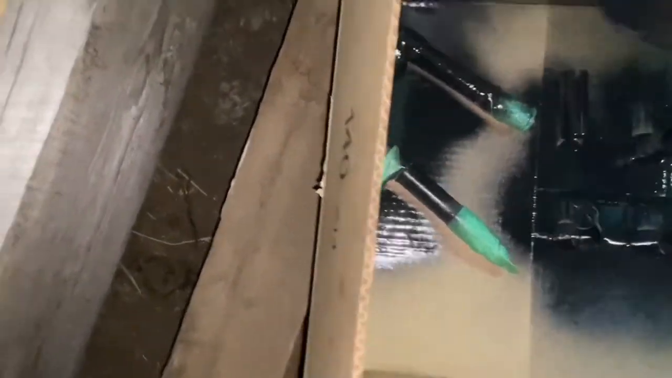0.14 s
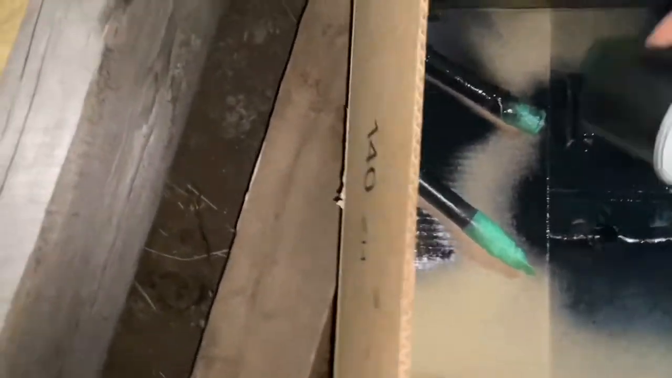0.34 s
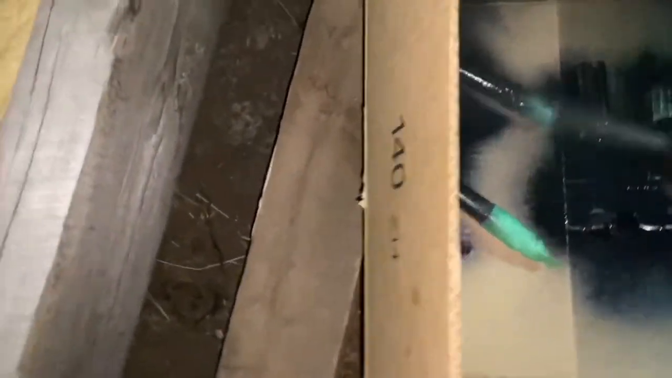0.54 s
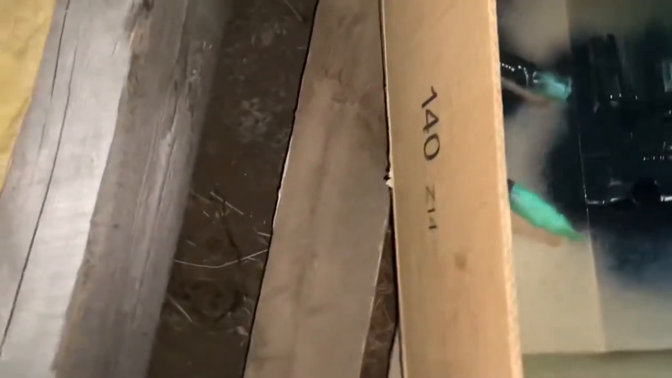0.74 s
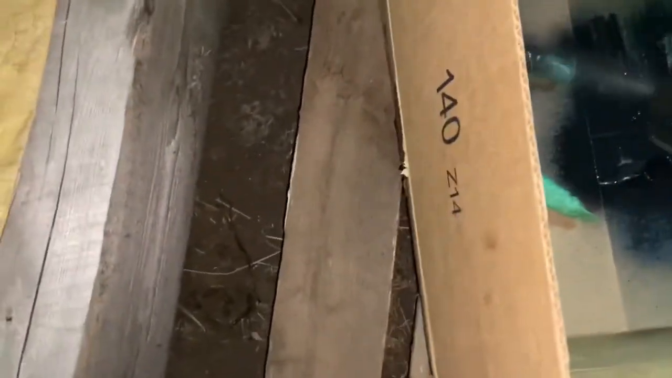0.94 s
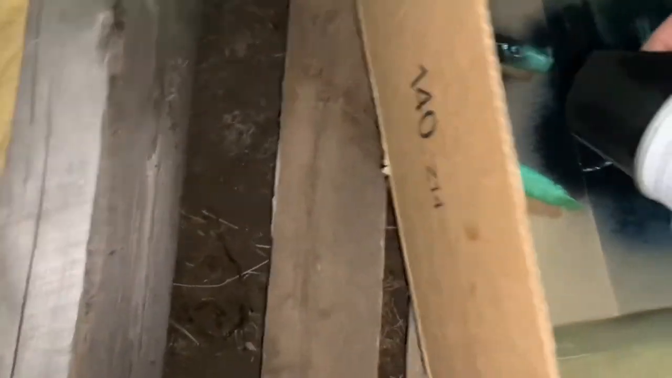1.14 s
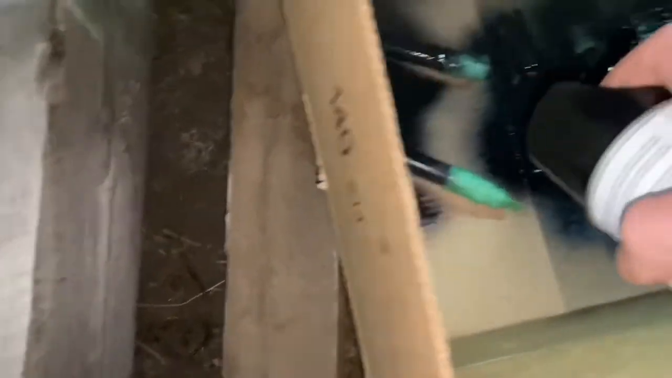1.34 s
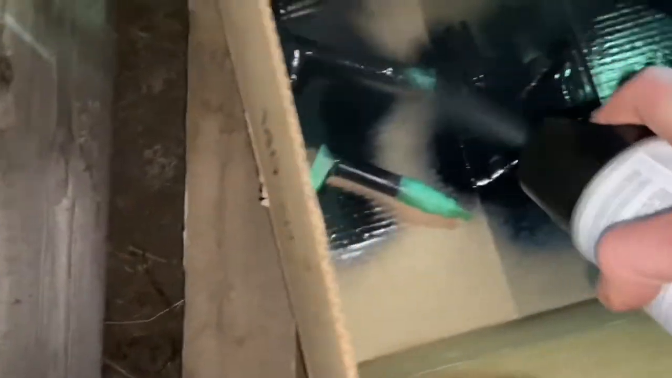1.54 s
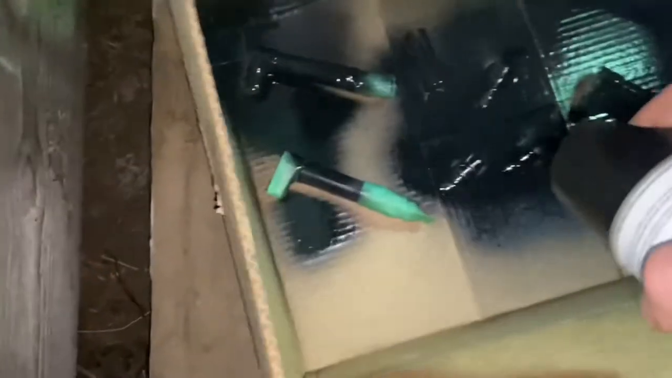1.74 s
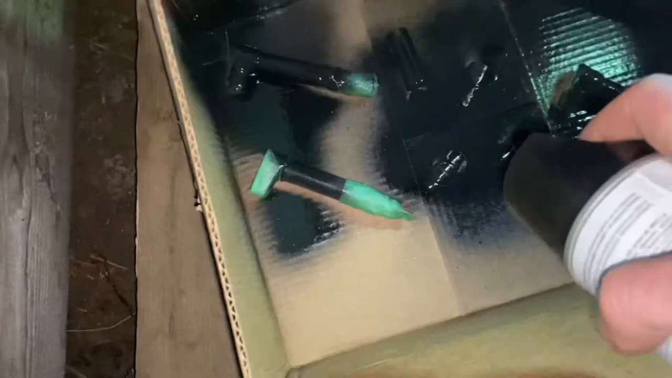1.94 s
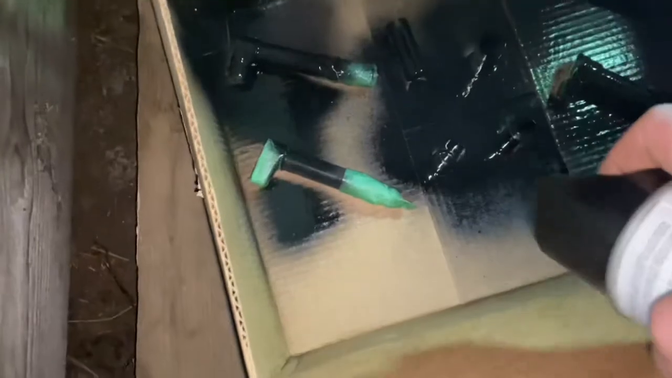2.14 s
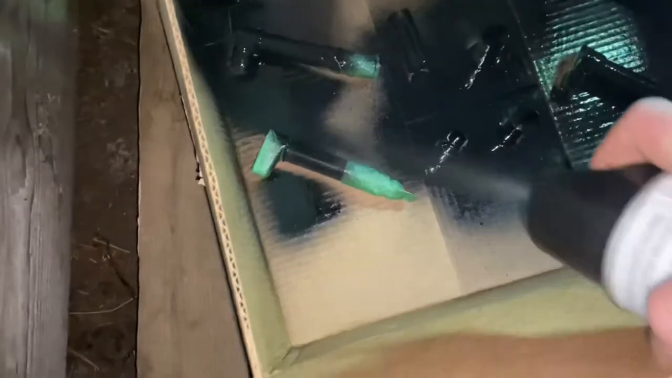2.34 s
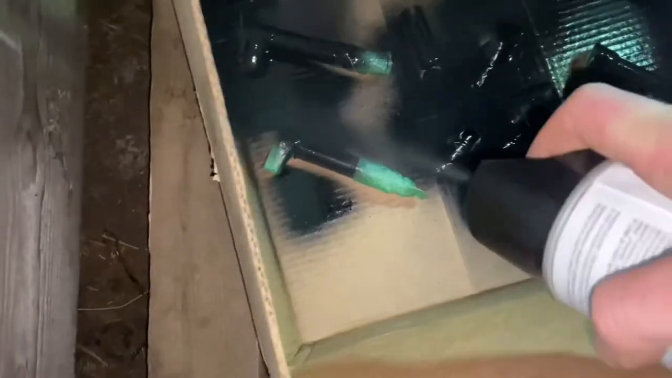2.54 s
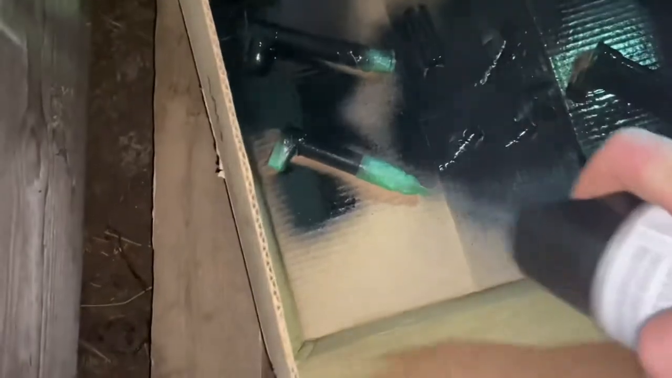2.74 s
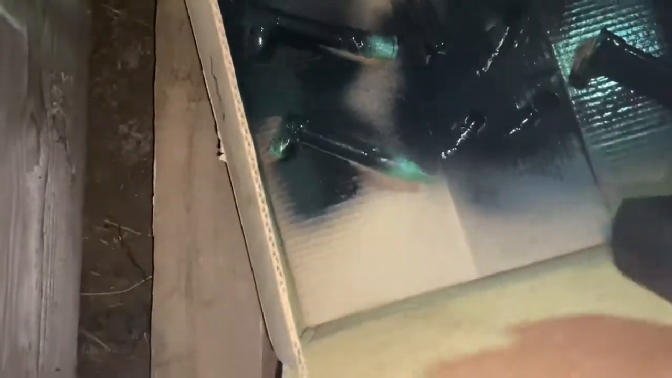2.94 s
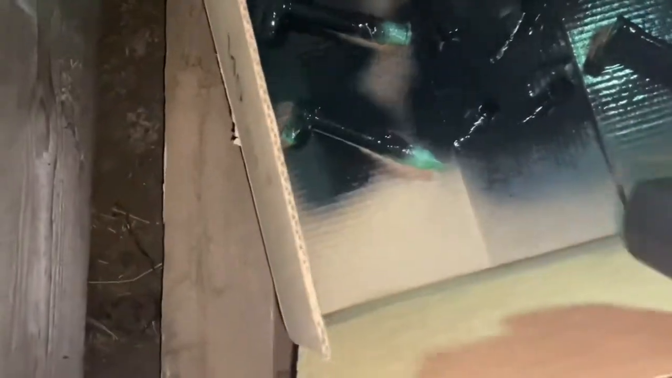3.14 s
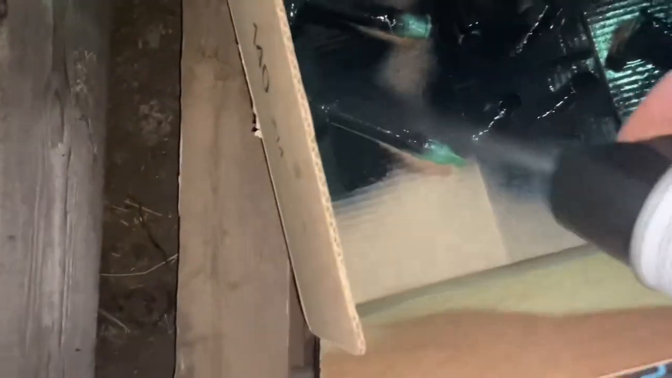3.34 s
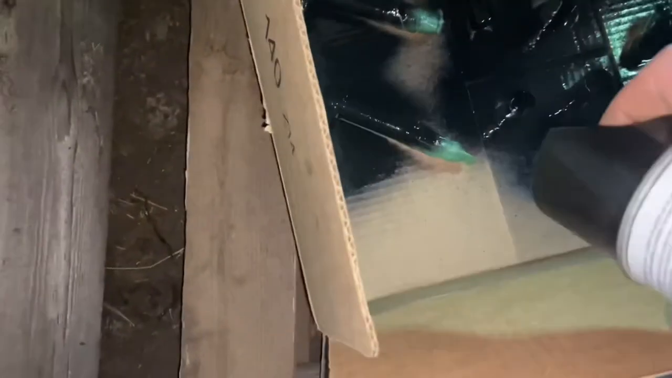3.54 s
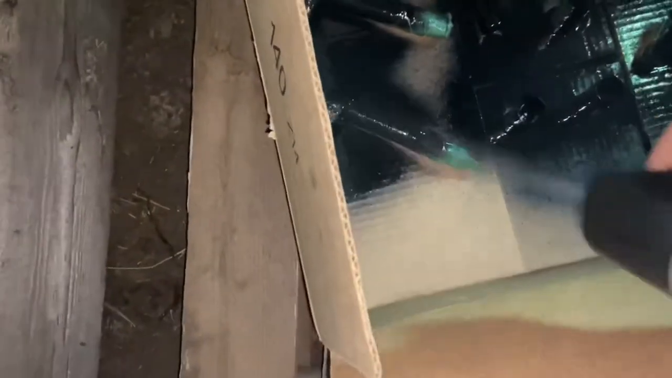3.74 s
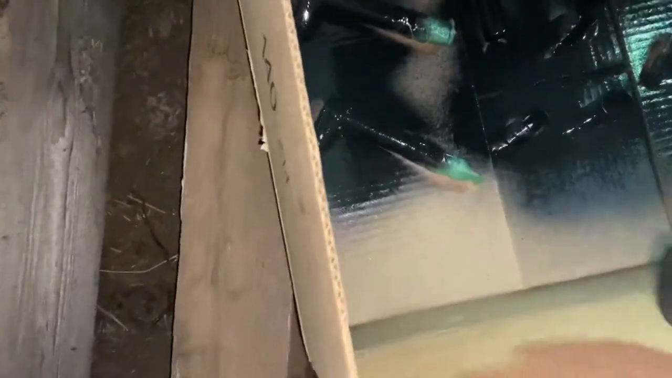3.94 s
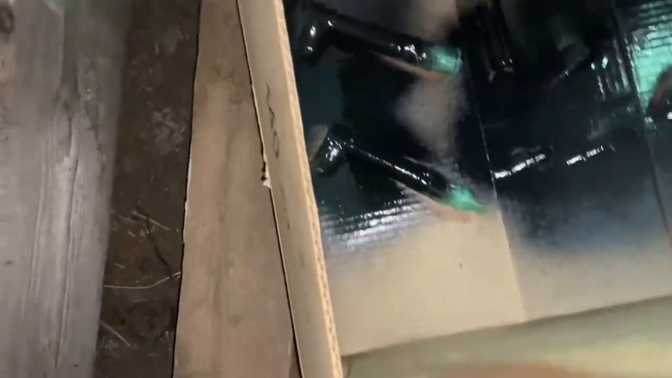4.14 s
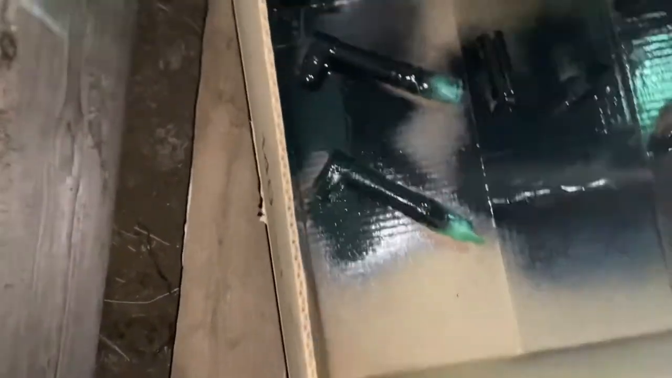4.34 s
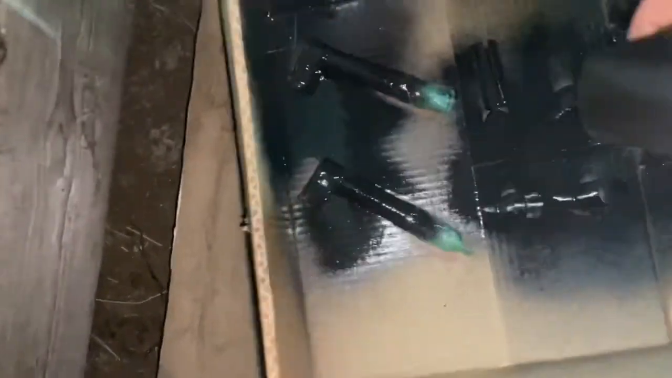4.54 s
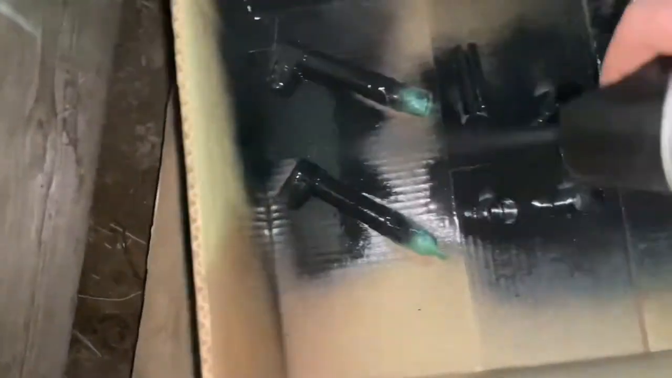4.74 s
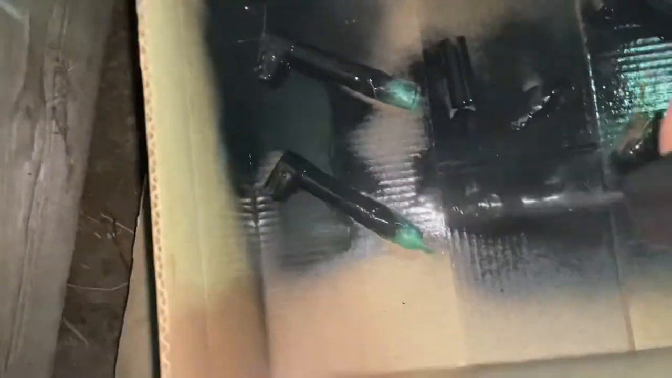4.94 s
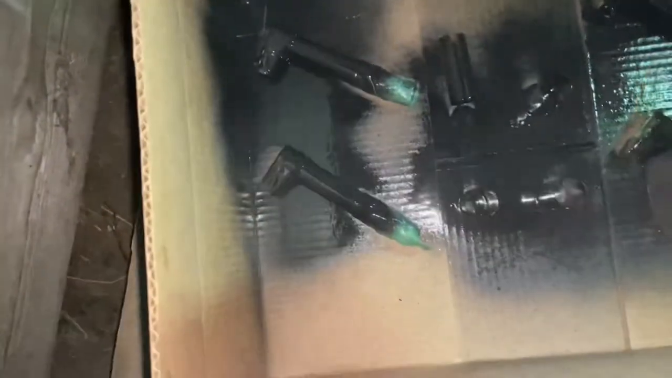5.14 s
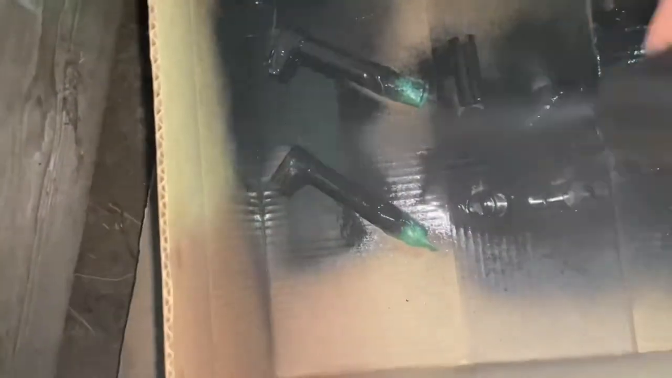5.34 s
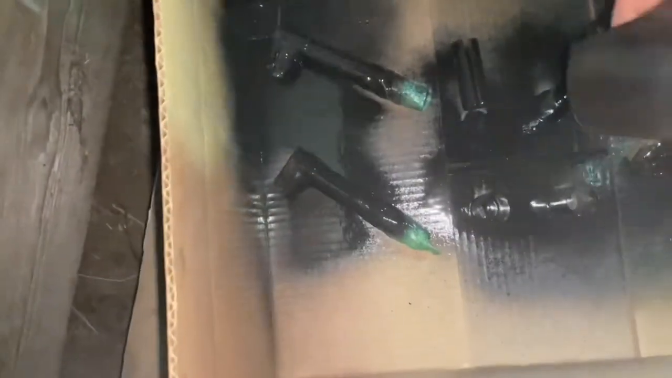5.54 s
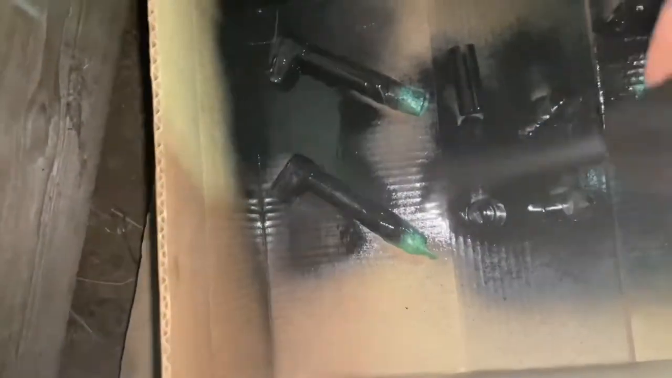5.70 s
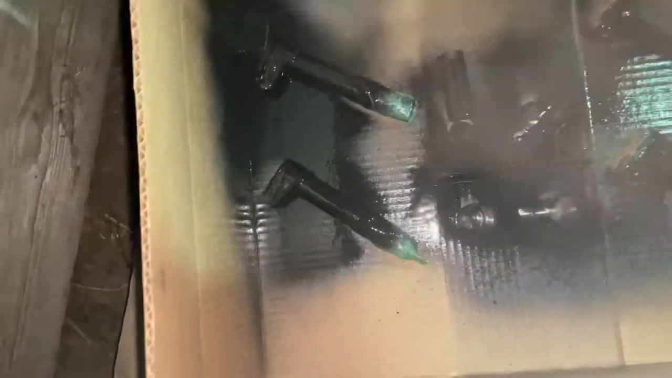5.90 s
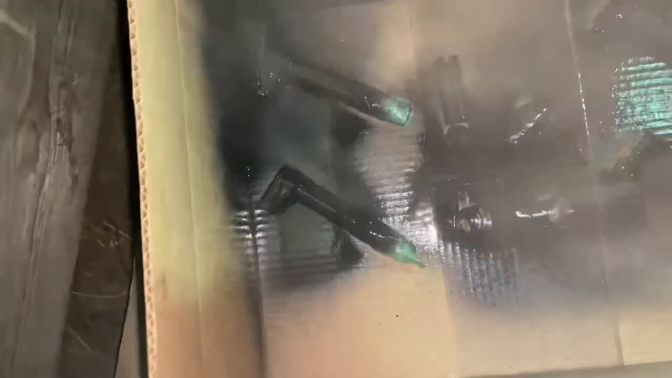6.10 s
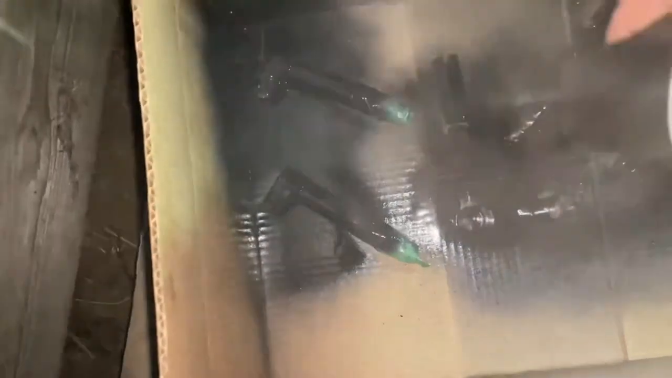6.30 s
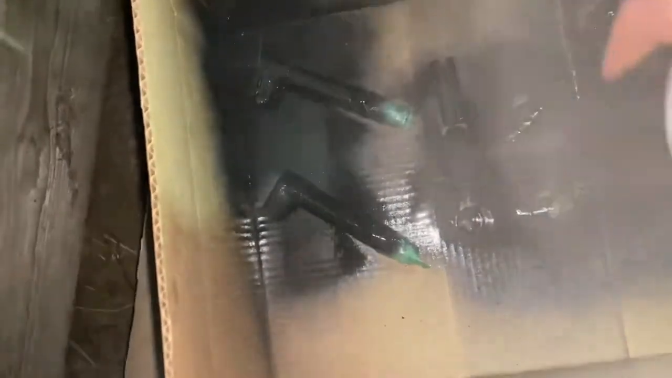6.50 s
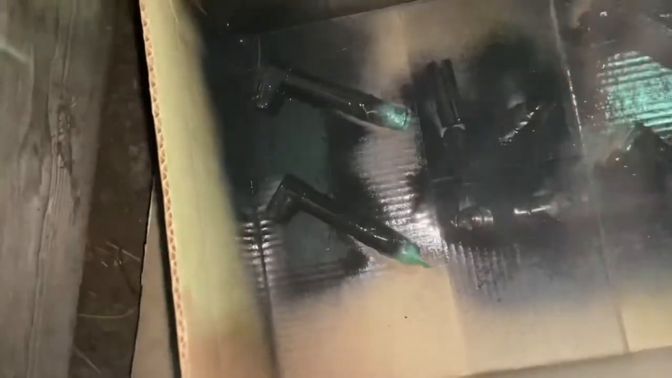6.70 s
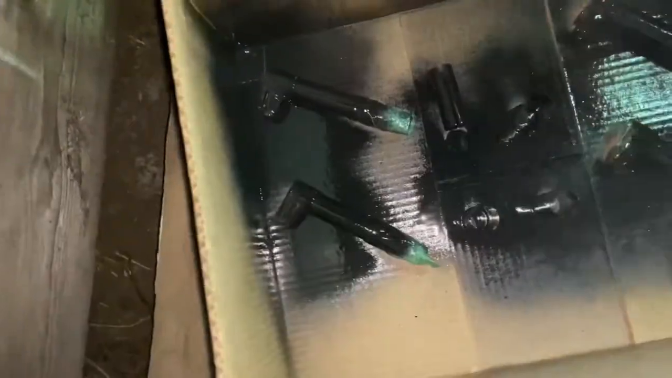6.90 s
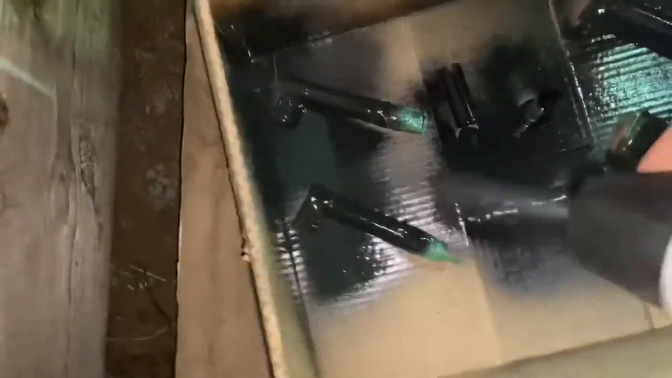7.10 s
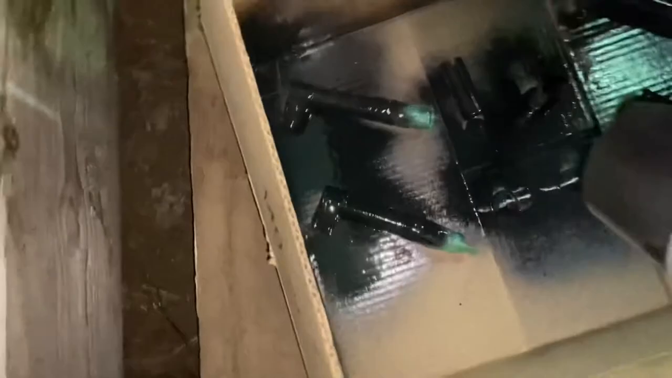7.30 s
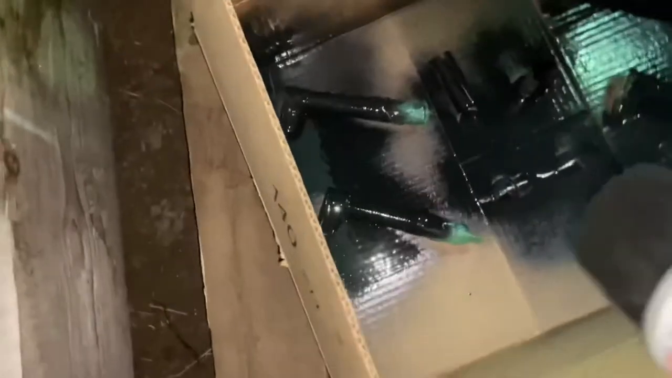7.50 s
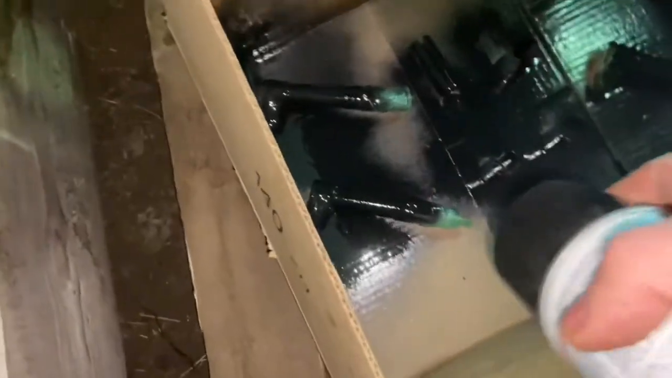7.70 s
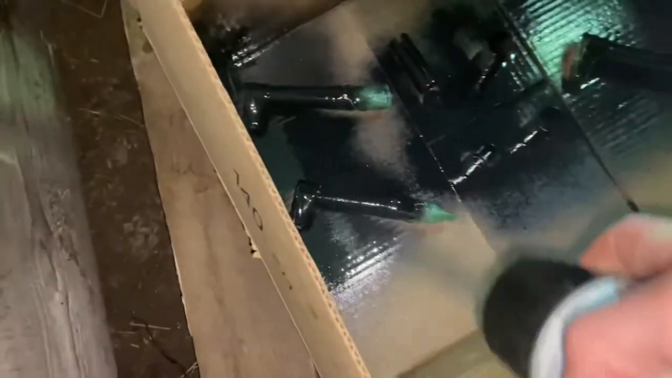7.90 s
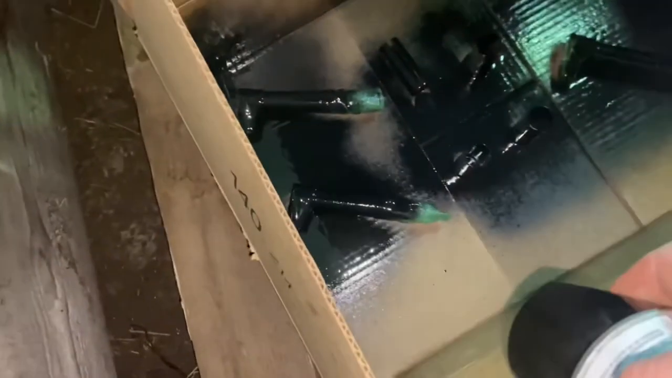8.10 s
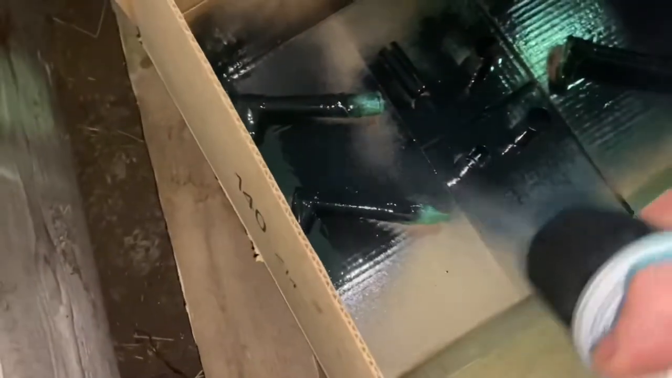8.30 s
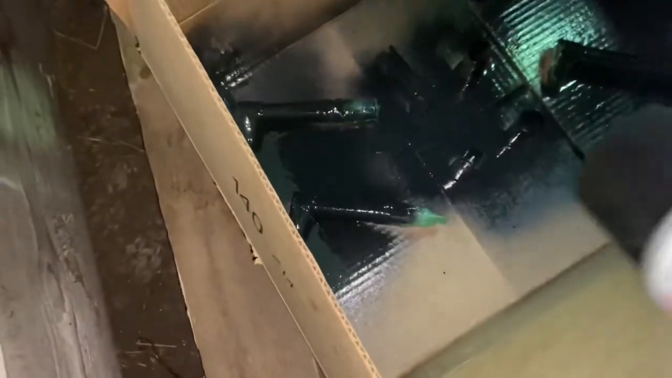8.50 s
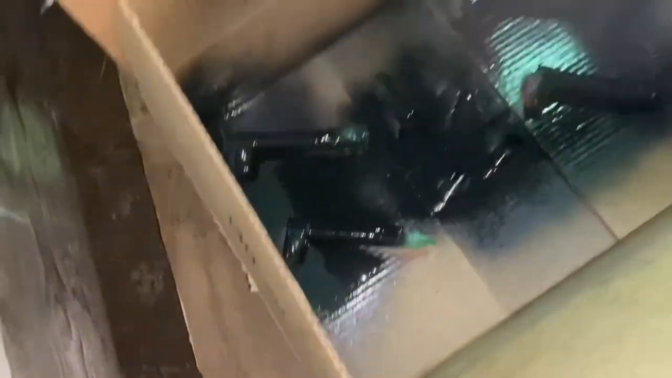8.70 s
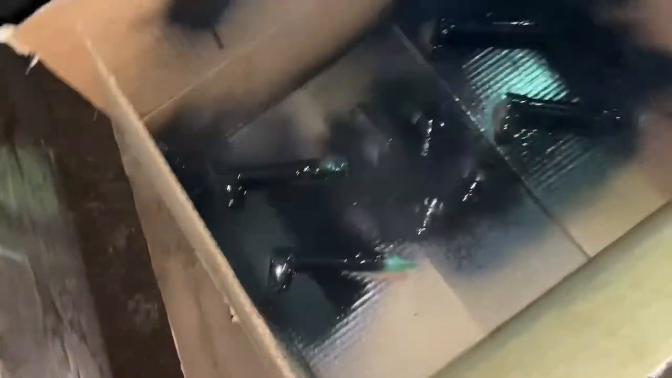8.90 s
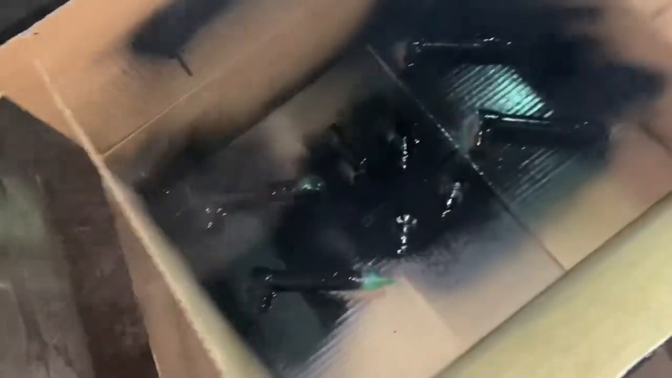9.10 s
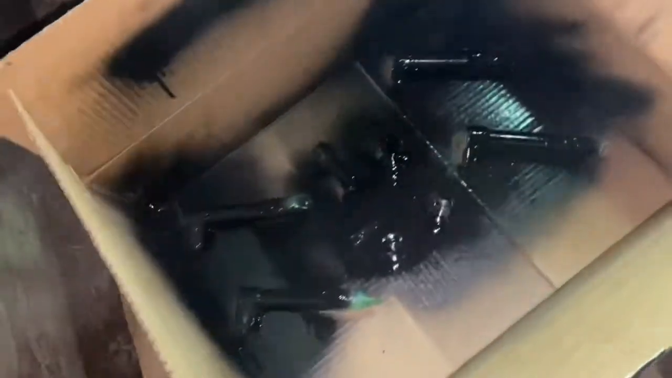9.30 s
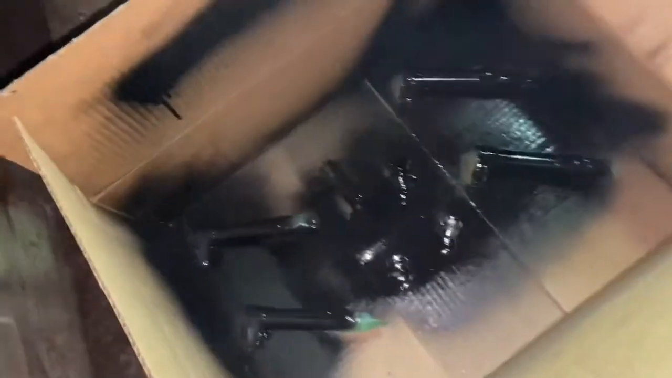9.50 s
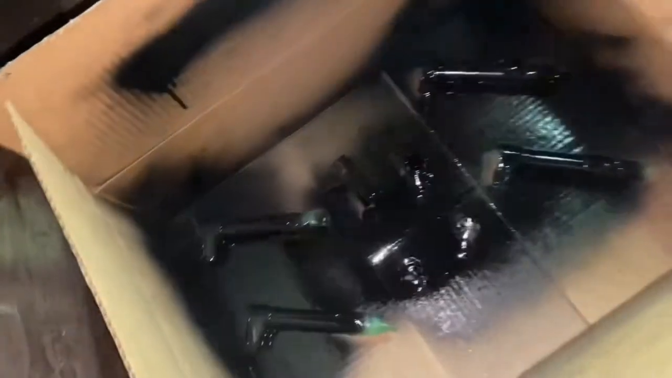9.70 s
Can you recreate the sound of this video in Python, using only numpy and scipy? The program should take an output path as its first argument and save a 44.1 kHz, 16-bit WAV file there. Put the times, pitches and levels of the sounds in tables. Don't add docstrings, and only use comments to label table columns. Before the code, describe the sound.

A close spray can puffs in quick quarter-second bursts inside a carton, before the carton is knocked and dragged and the can's ball clacks loudly.

```python
import sys
import numpy as np
from scipy import signal
from scipy.fft import rfft, irfft, next_fast_len
from scipy.io import wavfile
from scipy.ndimage import uniform_filter1d

SR = 44100
rng = np.random.default_rng(int(sys.argv[2]) if len(sys.argv) > 2 else 0)


def ratio_of_db(decibels):
    return 10 ** (np.asarray(decibels, float) / 20)


def materialize(psi):
    bounded = np.clip(np.atleast_2d(psi).T, -1, 1)
    quanta = np.round(bounded * 32767).astype(np.int16)
    wavfile.write(sys.argv[1], SR, quanta)


N = 429975

# valve opens in seconds, valve shuts in seconds, flow in dB,
# cap ring early in the burst in dB, cap ring late in dB.
SQUEEZES = [(-.05, 0.087, -36, 16, -7), (0.35, 0.609, -36, 0.5, -0.5), (0.836, 1.057, -36, 1, 3.5),
            (1.373, 1.614, -37, 9.5, 5.5), (2.241, 2.514, -34.5, -4.5, -6.5), (2.69, 2.961, -36, 0, 1.5),
            (3.15, 3.389, -35, -6, 3), (3.65, 3.879, -34.5, -9, -3.5), (4.261, 4.484, -35, -2, 10.5),
            (4.661, 4.933, -33.5, -0.5, 4.5), (5.155, 5.393, -34, 2, 2.5), (5.583, 5.849, -33, -3, 5.5),
            (6.073, 6.286, -34, -0.5, 3.5), (6.442, 6.676, -33.5, -4.5, 2.5), (6.951, 7.141, -33.5, -6, -1),
            (7.759, 7.978, -35, 3.5, 4.5), (8.19, 8.369, -35.5, -2.5, -2)]
# cap pitch in Hz, fine mist in dB, low body in dB,
# path to the box wall in ms, gust on the microphone in dB.
HOLDS = [(2363, -1, 0.5, 1.33, -72), (2190, -0.5, 2, 1.33, -78), (2334, -0.5, 1, 1.8, -60),
         (2327, 0, 2.5, 1.5, -57), (2066, -2.5, 1.5, 1.6, -49), (2340, -1.5, 4, 1.5, -46.5),
         (2110, -1, 1, 1.61, -48), (2160, -1, 1, 1.36, -47), (2374, 0, 3.5, 1.5, -51),
         (2310, 0.5, 2.5, 1.3, -51.5), (2326, 1, 2, 1.33, -51.5), (2334, 0.5, 1, 1.33, -68.5),
         (2296, -1, 0.5, 1.33, -79), (2286, -0.5, 0.5, 1.5, -65.5), (2170, -2.5, 0.5, 2.2, -72.5),
         (2210, 1, 3, 1.5, -65), (2423, 2.5, 3, 1.7, -47)]
# time in seconds, level in dB, brightness in dB.
BOX_DRAG = [
    (8.41, -57, -10.5),
    (8.65, -62, -2.5),
    (8.81, -57.5, -6.5),
    (8.89, -38.5, -20),
    (9.05, -42.5, -1.5),
    (9.08, -56.5, -2.5),
    (9.155, -53.5, 0),
    (9.175, -51, 1),
    (9.24, -62, -7),
]


def evened(x):
    return x / np.sqrt(np.mean(x ** 2) + 1e-20)


def read(points, hz):
    f, value = np.transpose(points)
    return np.interp(np.log(hz + 1), np.log(f + 1), value)


def add(mix, s, sound):
    part = mix[..., max(round(s * SR), 0):][..., :sound.shape[-1]]
    part += sound[..., :part.shape[-1]]


def follow(table, t, column, silent=None):
    points = [(row[0], row[column]) for row in table]
    if silent is not None:
        points = [(points[0][0] - .012, silent)] + points + [(points[-1][0] + 0.0076, silent)]
    return np.interp(t, *np.transpose(points))


def passband(x, lo_hz, hi_hz):
    sos = signal.butter(2, [lo_hz, min(hi_hz, 20000)], "bandpass", fs=SR, output="sos")
    return signal.sosfilt(sos, x)


def ring(modes, length=6000):
    t = np.arange(length) / SR
    return sum(ratio_of_db(db - 60 * t / max(t60, .005)) * np.sin(2 * np.pi * hz * t) for hz, db, t60 in modes)


def flicker(ms, depth_db):
    pole = np.exp(-1000 / (ms * SR))
    return ratio_of_db(depth_db * evened(signal.lfilter([1], [1, -pole], rng.standard_normal(N))))


def noise(colour, size, lo_hz, hi_hz, patchy_db):
    # frequency in Hz, likeness of the two ports (0-1).
    likeness = [(60, .99), (600, .96), (1100, .86), (1900, .99), (3100, .75), (3600, .9), (4500, .75),
                (5000, .97), (6000, .93), (6900, .985), (7900, .985), (8700, .8), (9900, .997),
                (11000, .997), (12000, .8), (13000, .993), (14000, .993), (15000, .8)]
    hop = size // 4
    frames, hz = N // hop + 5, np.fft.rfftfreq(size, 1 / SR)[:, None]
    a, b, c, d, patches = rng.standard_normal((frames, len(hz), 5)).T
    patches = uniform_filter1d(uniform_filter1d(patches, size=3, axis=0), size=24, axis=1)
    blotches = uniform_filter1d(uniform_filter1d(d * a, size=14, axis=0), size=6, axis=1)
    patches = .4 * evened(blotches[::-1]) + np.minimum(evened(patches), .8)
    same, left = np.clip(read(likeness, hz), -1, 1), a + 1j * b
    right = same * left + np.sqrt(1 - same ** 2) * (c + 1j * d)
    scatter = np.clip(hz / 5200, .35, 1)
    gain = ratio_of_db(colour(hz, np.arange(frames) * hop / SR) + patchy_db * scatter * patches)
    band = ((hz > lo_hz) & (hz < hi_hz))[:, 0]
    gain = gain / np.sqrt((gain[band] ** 2).sum(0).mean() * 3)
    return signal.istft(np.array([left, right]) * gain, nperseg=size, noverlap=size - hop)[1][:, :N]


def valve(t):
    # seconds from opening, flow in dB.
    press = [
        (-.026, -72),
        (-.02, -25.5),
        (-.004, -16),
        (.004, -5.5),
        (0.024, 0.5),
    ]
    # seconds from shutting, flow in dB.
    release = [
        (-.06, 0.5),
        (0, -3.5),
        (.02, -37.5),
        (.05, -92),
    ]
    leak_s = [.02, 0.029, 0.018, 0.029, 0.024, .024, 0.024, 0.025, 0.026, 0.018, 0.022, 0.018, .017, 0.019,
              0.016, 0.024, 0.015]
    usual_leak_s, sag_db_per_s = .02, 5
    opens, shuts, flow_db = np.array(SQUEEZES)[:, :3].T
    k = np.searchsorted((shuts[:-1] + opens[1:]) / 2, t)
    since = t - opens[k]
    leak_time = np.where(since < 0, since * usual_leak_s / np.array(leak_s)[k], since)
    edges = np.interp(leak_time, *np.transpose(press)) + np.interp(t - shuts[k], *np.transpose(release))
    return k, flow_db[k] + edges - sag_db_per_s * np.clip(since - .12, -.12, .3), since


def yard():
    # time in seconds, level in dB.
    rumble = [(0, -65.5), (1.2, -67.5), (1.6, -65.5), (2.2, -55.5), (2.7, -59), (5.2, -61.5), (5.5, -65.5),
              (6.6, -74.5), (7.1, -67), (7.75, -68.5), (7.9, -53), (8.5, -60.5), (9.2, -57.5), (9.75, -58)]
    # frequency in Hz, level in dB.
    low = [(20, -17), (32, -32.5), (45, -4), (70, 0.5), (120, -6), (250, -6), (500, -12), (900, -39.5),
           (5000, -45), (9000, -49.5)]
    # time in seconds, pitch in Hz, level in dB.
    motor = [
        (1.55, 113, -63.5),
        (1.9, 114.4, -62.5),
        (2.3, 116.3, -58),
        (2.65, 113.6, -62),
    ]
    # time in seconds, pitch in Hz, level in dB.
    drone = [
        (8.3, 67.9, -66),
        (8.368, 65.4, -60),
        (9.398, 66.4, -58.5),
        (9.494, 68.8, -50),
        (9.75, 68, -61.5),
    ]
    gust_fade_db_per_s = 17
    t = np.arange(N) / SR
    burst, flow_db, since = valve(t)
    gust = ratio_of_db(np.array(HOLDS)[burst, 4] + flow_db + 36.5 - gust_fade_db_per_s * since)
    level = np.hypot(ratio_of_db(follow(rumble, t, 1)), gust)
    out = level * noise(lambda hz, s: read(low, hz) + 0 * s, size=2048, lo_hz=30, hi_hz=160, patchy_db=1.5)
    waver = uniform_filter1d(flicker(40, 2.5), size=1500)
    for rows, second_db, uneven in ((motor, -5, 1), (drone, -14, 2)):
        turn = 2 * np.pi * np.cumsum(follow(rows, t, 1)) / SR
        tone = np.sin(turn) + ratio_of_db(second_db) * np.sin(2 * turn)
        out = out + waver ** uneven * ratio_of_db(follow(rows, t, 2, silent=-110)) * tone
    return out


def walls(x):
    t = np.arange(9000) / SR
    common, left, right = rng.standard_normal((3, 9000)) * ratio_of_db(-60 * t / 0.14) * (t > .003)
    tail = common + .35 * np.array([left, right])
    return signal.oaconvolve(x[None], tail / np.linalg.norm(tail[0]), axes=1)[:, :N]


def dragging(t):
    return (t > BOX_DRAG[0][0]) & (t < BOX_DRAG[-1][0])


def strokes(t):
    # start in seconds, level in dB,
    # fade in dB per second, brightness in dB.
    rustles = [(0, -49, 15, 0.5), (.62, -52, 100, -4.5), (1.08, -57.5, 73.5, -1), (1.63, -60, 68, -8.5),
               (1.8, -70.5, 4.5, -27.5), (2.03, -68.5, 22, -6), (2.1, -68, -2.5, -27),
               (2.53, -58, 97.5, -6.5), (2.98, -63.5, 35, 0.5), (3.05, -57.5, 76, -1.5),
               (3.4, -60.5, 70.5, -11.5), (3.9, -64, -6, 0), (4.5, -52, 87.5, -4.5),
               (4.96, -61.5, 163.5, -0.5), (5.1, -76, 1, -9), (5.42, -58.5, 159.5, -4.5),
               (5.5, -69, 1.5, -8.5), (5.87, -59, 156, -14), (5.97, -76.5, 1.5, -11.5),
               (6.3, -54.5, 148, -10), (6.69, -60.5, -2.5, 0.5), (7.17, -58, 17, -2), (7.54, -63.5, 8, -3),
               (8.001, -48.5, 179.5, -2.5), (9.2, -54.5, 0.5, -3)]
    dulling = 0.4
    rows = np.array(rustles)
    s, db, fade, bright_db = rows[np.searchsorted(rows[1:, 0], t)].T
    faded = np.minimum(fade * (t - s), 25.5)
    level_db = np.where(dragging(t), follow(BOX_DRAG, t, 1), db - faded)
    return level_db, np.where(dragging(t), follow(BOX_DRAG, t, 2), bright_db - dulling * faded)


def friction():
    # frequency in Hz, level in dB.
    cloth = [(150, -26), (500, 1), (1000, 0.5), (2200, -3.5), (4000, -3.5), (6000, -5.5), (10000, -11),
             (16000, -16)]
    # frequency in Hz, level in dB.
    cardboard = [(150, -7), (230, -12), (270, 14.5), (320, -19), (600, 1), (1000, -4), (2000, -3),
                 (3000, -7), (6000, -6), (10000, -11), (16000, -14)]
    # time in seconds, half
    # length in seconds, frequency in Hz, level in dB.
    swishes = [
        (6.864, 0.2, 540, 13.5),
        (8.733, 0.12, 3000, 11.5),
        (8.752, 0.054, 5870, 9),
    ]

    def colour(hz, t):
        body = np.where(dragging(t), read(cardboard, hz), read(cloth, hz))
        for s, half, swish_hz, swish_db in swishes:
            octaves = np.log2((hz + 1) / swish_hz)
            body = body + swish_db * np.exp(-((t - s) / half) ** 4 - (octaves / 0.31) ** 2)
        return body + (strokes(t)[1] + 3) * np.clip(np.log2((hz + 1) / 2000) / 2.8, 0, 2)

    t = np.arange(N) / SR
    grain_db = np.where(dragging(t) & (t > 8.87), 3, 1.6)
    stroke = ratio_of_db(uniform_filter1d(strokes(t)[0], size=200) + 0.52 * dragging(t)) * flicker(5.8, grain_db)
    return stroke * noise(colour, size=512, lo_hz=700, hi_hz=3500, patchy_db=3.0)


def thumps():
    # time in seconds, peak in dB, deep thud over it in dB,
    # panel tension as a pitch factor.
    blows = [
        (7.85, -37, -2, 1.07),
        (7.928, -26, -13.5, 1.12),
        (8.02, -26.5, -9.5, 1.0),
    ]
    # frequency in Hz, level in dB, t60 in seconds.
    panel_modes = [(154, -20, 0.27), (204, -6.5, 0.25), (240, 0.5, 0.13), (315, -3.5, 0.086)]
    out, t = np.zeros(N), np.arange(9000) / SR
    thud = ratio_of_db(-60 * t / 0.39) * np.sin(2 * np.pi * 46 * t) * np.minimum(t / 0.022, 1)
    for s, db, thud_db, tension in blows:
        tuned = [(hz * tension, d, t60) for hz, d, t60 in panel_modes]
        panels = ring(tuned, length=9000) * np.minimum(t / 0.0073, 1)
        add(out, s, ratio_of_db(db) * (panels / abs(panels).max() + ratio_of_db(thud_db) * thud))
    return out


def ticks():
    # time in seconds, peak in dB, pitch in Hz,
    # ring time in seconds, crackle in dB.
    contacts = [(0.166, -42.5, 844, 0.11, 20), (0.788, -46.5, 2150, 0.15, 18.5),
                (1.124, -37, 1830, 0.065, 11.5), (1.8383, -36.5, 2190, 0.032, -32),
                (1.8402, -33, 1400, 0.018, -27), (1.934, -51.5, 1210, 0.062, -17), (2.03, -63, 6000, 0.01, 17),
                (2.049, -50, 1400, 0.033, -10), (3.047, -44, 5170, 0.25, 8.5), (5.054, -42.5, 980, 0.1, 4.5),
                (7.253, -34, 2000, 0.069, 5), (7.284, -40, 2110, 0.066, 13.5), (7.543, -33, 1550, 0.025, -16),
                (7.588, -48, 1450, 0.041, -11), (8.017, -38, 845, 0.11, -18), (8.629, -49, 2500, 0.016, 22),
                (8.651, -44, 6400, 0.015, 7), (8.041, -45.5, 4570, 0.03, 19), (8.676, -34, 5370, 0.015, -2),
                (8.676, -44, 2900, 0.018, 0), (8.879, -18.5, 4680, 0.06, -11), (8.878, -25.5, 2740, 0.14, -3),
                (8.876, -31, 1800, 0.044, -8), (8.926, -29, 1910, 0.063, 4), (8.928, -29, 4530, 0.046, 4),
                (8.93, -30, 780, 0.071, -8), (8.829, -54, 1900, 0.1, 0), (8.959, -24.5, 700, 0.017, -15),
                (8.945, -36, 900, 0.048, 0), (9.004, -28, 2000, 0.056, 2), (9.1, -48, 729, 0.063, 8),
                (9.168, -37.5, 4330, 0.14, 8), (0.646, -41, 1300, .04, -7), (1.64, -54, 420, .15, -20),
                (3.06, -49, 2200, .06, 4), (5.437, -52, 1800, .04, -1), (5.564, -42, 1610, 0.035, -6),
                (7.115, -47, 210, 0.05, -25), (8.02, -43, 2500, .06, 3), (8.043, -41.5, 1510, 0.032, 0),
                (3.053, -45.5, 366, 0.32, -12),
        (8.905, -34, 1000, .05, 3),
        (8.975, -42, 500, .06, 0),
        (9.025, -37, 800, .06, 0),
        (9.04, -45, 450, 0.042, 0),
    ]
    rise_cycles, longest_rise_s = 7.5, 0.0037
    grit = 0.56
    out, t = np.zeros(N), np.arange(4000) / SR
    for s, db, hz, t60, crackle_db in contacts:
        puff = ratio_of_db(-60 * t / max(t60, .005)) * rng.standard_normal((2, 4000))
        puff = puff * np.repeat(rng.exponential(1, 50), 80) ** grit
        modes = [(hz * k, d, 6 / hz) for k, d in ((0.993, 11.0), (0.46, -22.0), (1.3, -26.0))]
        sound = signal.fftconvolve(puff[0] * (1 + 1.4 * (t < .002)), ring(modes, length=890))[:4000]
        sound = passband(sound, .5 * hz, 2.4 * hz)
        crackle = passband(puff[1], max(400, 0.31 * hz), 2.63 * hz) / 3
        sound = sound / abs(sound).max() + ratio_of_db(crackle_db) * crackle
        add(out, s, ratio_of_db(db) * sound * np.minimum(t / min(rise_cycles / hz, longest_rise_s), 1))
    return out


def rattle():
    # time in seconds,
    # peak in dB, share of the low shell modes in dB, beating pair in dB, skid in seconds.
    blows = [(9.2525, -11.5, -12.5, 0.5, .0065), (9.3568, -28.5, 1, -6, .008), (9.388, -40, -29, 4, .004),
             (9.3929, -15, -14, 1.5, 0.0036), (9.409, -34.5, 1, 0, 0.0094),
             (9.4713, -18.5, -13.5, -2, 0.0043), (9.514, -31.5, -1, 1, 0.0062), (9.522, -30, 6, -3, .008),
             (9.538, -22, -14.5, 0, 0.0049), (9.577, -38, 6, -3, .01), (9.599, -22, -8.5, 4.5, 0.0069),
             (9.645, -27.5, -7.5, -2, 0.0057), (9.662, -33, 3.5, -2, 0.0098), (9.6796, -29.5, -8, 3, .003),
             (9.712, -27.5, -6, -2.5, 0.0028), (9.738, -35, -6, -0.5, .003)]
    # frequency in Hz, level in dB, t60 in seconds.
    shell = [(1720, -5, .014), (2190, -5, .02), (2530, -5, .014), (2890, -8, .012), (4400, -9, .022),
             (5750, -20, .008), (6600, -9, .008), (7150, -5, .018), (8250, -14, .016), (9150, -14, .008),
             (9900, -10, .01), (11270, -13, .009), (13900, -12, .008), (15200, -17, .006)]
    # centre in Hz, split in Hz, t60 in seconds, level in dB.
    beating_pair = (4350, 85, .03, 7.5)
    spot_db, spot_detune = 3, .012
    out, t = np.zeros(N), np.arange(6000) / SR
    hz, split, t60, twins_db = beating_pair
    for s, db, low_db, pair_db, skid_s in blows:
        spot = rng.standard_normal((len(shell) + 1, 2))
        modes = [(f * (1 + spot_detune * u), d + spot_db * v, r) for (f, d, r), (u, v) in zip(shell, spot)]
        pair_hz = hz * (1 + spot_detune * spot[-1, 0] / 2)
        twins = ring([(pair_hz, twins_db + pair_db + 20, t60)]) * np.sin(np.pi * split * t + .25)
        skid = ratio_of_db(-60 * t / .06) * np.clip((skid_s - t) / .001, 0, 1)
        roll = ratio_of_db(-24 - 60 * t / 0.21) * np.repeat(rng.exponential(1, 60), 100)
        a, b, c = rng.standard_normal((3, 6000))
        shell_low = ratio_of_db(low_db + 6.0) * ring(modes[:3])
        shell_high = ratio_of_db(-.4 * low_db) * ring(modes[3:])
        blow = skid * a + 2 * (t == 0)
        sound = signal.fftconvolve(blow, shell_low + shell_high)[:6000] + ratio_of_db(-low_db - 15.5) * twins
        sound += signal.fftconvolve(roll * b, ratio_of_db(8) * shell_low + ratio_of_db(-11) * shell_high)[:6000]
        scrape = ratio_of_db(-21.5) * (skid + ratio_of_db(6) * roll) * c
        add(out, s - .0005, ratio_of_db(db + 1.5) * (sound / abs(sound).max() + scrape))
    return passband(passband(out, 1600, 17000), 1500, 15000)


def spray():
    # frequency in Hz, level in dB.
    jet_spectrum = [(60, -35), (250, -14), (410, -13), (520, -5), (750, -4.5), (1100, -5.5), (1600, -0.5),
                    (2350, 2.5), (2700, -4), (3100, -9.5), (4200, -7), (5500, 0.5), (7000, -5.5),
                    (8500, -9.5), (11000, -6), (14000, -4.5), (16000, -6)]
    # factor on its pitch, width in Hz, level in dB.
    cap_modes = [(0.96, 123, 5.5), (1, 260, 0.5)]
    # early notch in Hz, late notch
    # in Hz, depth (0-1), echo share (0-1).
    weak_bands = [(3400, 3400, 0.8, .4), (3130, 4000, 0.9, 0.54), (2950, 3600, 0.7, 0.13),
                  (3400, 3600, 0.4, 0.55), (3200, 3100, 0.5, 0.19), (2930, 3060, 0.7, 0.31),
                  (3150, 3100, .65, 0.3), (3220, 3400, .8, 0.34), (3190, 1400, 1, .4),
                  (3270, 3150, .75, 0.24), (2940, 3100, 0.8, .4), (2980, 2980, 1, 0.35),
                  (2930, 2600, 1, 0.49), (2950, 2850, .7, 0.55), (3650, 3570, 0.9, 0.31),
                  (3030, 2800, 0.4, 0.25), (3420, 3490, .65, 0.58)]
    # pitch glide over the burst as a share, width as a
    # factor, extra level of the broad second ring in dB.
    turning = [(0, .8, -4.5), (0.089, 1.6, -1.5), (-0.013, 0.67, -1.5), (-.02, 0.64, -1.5), (.08, 1.9, 4),
               (0, 1, -0.5), (.03, 1.7, 0.5), (.02, 1.3, 0), (-0.032, 0.62, 1), (-0.065, 2.2, 0.5),
               (.02, 0.97, -1), (0.056, 1.5, 3), (-0.0061, 1.3, 3.5), (-.01, 1.1, 3.5), (.03, 1.6, 1.5),
               (-0.0073, 2.4, 1.5), (.05, 1.3, 4)]
    # time in seconds, frequency in Hz, half length
    # in seconds.
    dead_bands = [(.6, 3650, .025), (.9, 3000, .045), (1.03, 3650, .03), (1.51, 3000, .03),
                  (2.4, 3200, .04), (2.89, 3000, .035), (4.32, 3150, .03), (4.38, 2850, .045),
                  (4.8, 3250, .04), (5.19, 3000, .018), (5.27, 3050, .045), (5.63, 3800, .028),
                  (5.75, 2950, .045), (5.81, 3850, .022)]
    dead_db, dead_width_hz = -26, 110
    paint_lag_s, dry_db = .02, -16

    def colour(hz, t):
        burst, _, since = valve(t)
        pitch, mist_db, body_db, path_ms = np.array(HOLDS)[burst, :4].T
        opens, shuts, _, early_db, late_db = np.array(SQUEEZES)[burst].T
        early_hz, late_hz, depth, wall = np.array(weak_bands)[burst].T
        glide, wide, broad_db = np.array(turning)[burst].T
        done = np.clip(since / (shuts - opens), 0, 1)

        wet_db = dry_db * np.clip(1 - since / paint_lag_s, 0, 1)
        mist_db = mist_db + .4 * wet_db
        slope_db = mist_db * np.clip((hz - 6000) / 3000, 0, 1)
        slope_db = slope_db + (body_db + wet_db) * np.clip((1500 - hz) / 900, 0, 2)

        pitch = pitch * (1 + glide * (done - .5) + 0.006 * np.sin(2 * np.pi * 5.3 * t))
        cap = 0
        for (k, width_hz, db), extra_db in zip(cap_modes, (0, broad_db)):
            off_centre = 2 * (hz - k * pitch) / (width_hz * wide)
            cap = cap + ratio_of_db(db + extra_db) ** 2 / wide / (1 + off_centre ** 2) ** 2
        ring_db = early_db + (late_db - early_db) * done

        delay_s = path_ms / 1000 * (1 + 0.04 * np.sin(2 * np.pi * 0.86 * t))
        echo = abs(1 + wall / (1 + (hz / 4200) ** 2) * np.exp(2j * np.pi * hz * delay_s))

        null_hz = early_hz + (late_hz - early_hz) * done ** 2 * (3 - 2 * done)
        null_hz = null_hz * (1 + .01 * np.sin(2 * np.pi * 10.0 * t))
        notch = 1 - np.clip(depth, 0, .98) / (1 + ((hz - null_hz) / 170) ** 2)
        lost_db = sum(dead_db * np.exp(-((t - s) / half) ** 4) * np.exp(-((hz - f) / dead_width_hz) ** 4)
                      for s, f, half in dead_bands)
        jet = ratio_of_db(read(jet_spectrum, hz) + slope_db) * echo
        return lost_db + 10 * np.log10(notch ** 2 * (jet ** 2 + ratio_of_db(ring_db + 6.0) ** 2 * cap))

    opening = ratio_of_db(valve(np.arange(N) / SR)[1] + 6.0)
    sputter = flicker(2.5, 1.03)
    return opening * sputter * noise(colour, size=1024, lo_hz=3000, hi_hz=7060, patchy_db=6.5)


def scene():
    jet, hits = spray(), ticks() + rattle()
    tail = walls(ratio_of_db(-15.5) * jet[0] + ratio_of_db(-10.5) * hits)
    port_difference = np.array([[.12], [-.12]]) * np.roll(hits, 11)
    return jet + hits + port_difference + tail + thumps() + friction() + yard()


def roll_off(x):
    return signal.sosfilt(signal.butter(12, 17100, fs=SR, output="sos"), x)


def record(dry):
    # frequency in Hz, phase by which left leads in radians.
    left_lead = [(0, -.1), (2000, 0), (2500, 1.0), (2950, .3), (3700, .2), (4200, 1.2), (5000, 0),
                 (6100, 1.4), (6750, np.pi), (7800, np.pi), (9800, 2 * np.pi), (11100, 2 * np.pi),
                 (12950, 3 * np.pi), (14150, 3 * np.pi), (15900, 4 * np.pi)]
    # frequency in Hz, left minus right level in dB.
    level_tilt = [(60, -.5), (600, -5), (1900, -.5), (2400, -3), (3100, .5), (4400, -2.5), (5300, .5),
                  (8000, 0)]
    edge_hz = 15850
    size = next_fast_len(N + 64)
    hz = np.fft.rfftfreq(size, 1 / SR)
    half = ratio_of_db(read(level_tilt, hz) / 2) * np.exp(.5j * np.interp(hz, *np.transpose(left_lead)))
    low_cut = 1 / np.sqrt(1 + (36 / (hz + 1)) ** 6)
    band = ratio_of_db(-65 * np.clip((hz - edge_hz) / 150, 0, 1)) * low_cut
    ports = irfft(rfft(dry, size) * np.array([half, 1 / half]) * band, size)[:, :N]
    return roll_off(ports)


dry = scene()
out = record(dry)
materialize(out)
```